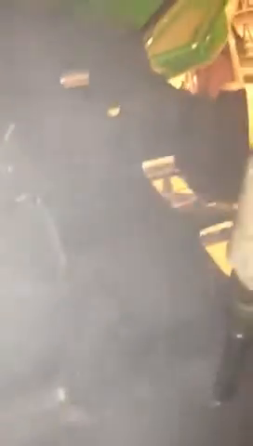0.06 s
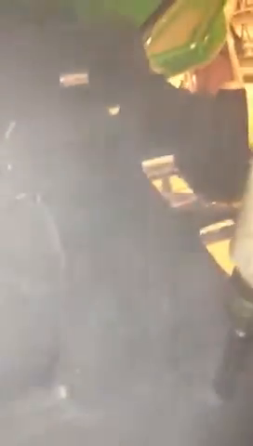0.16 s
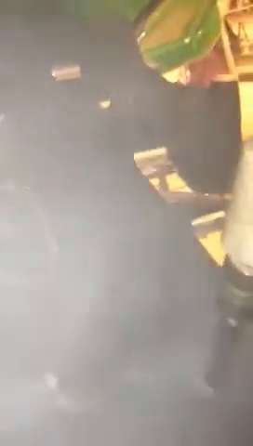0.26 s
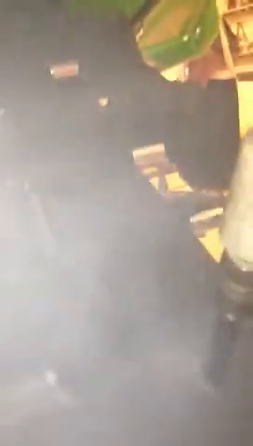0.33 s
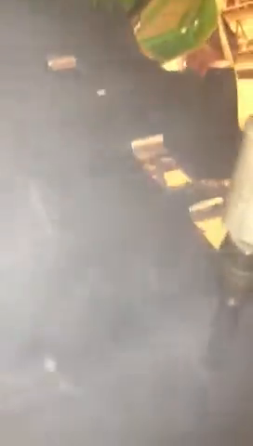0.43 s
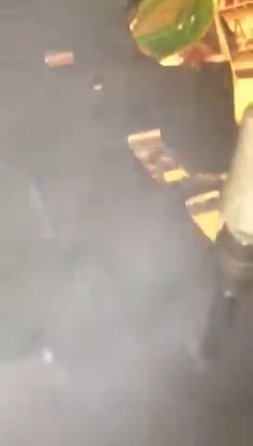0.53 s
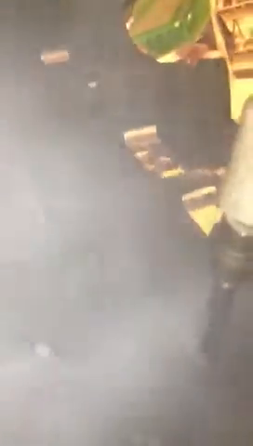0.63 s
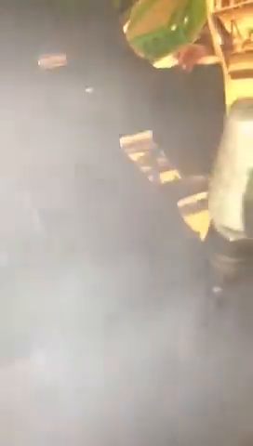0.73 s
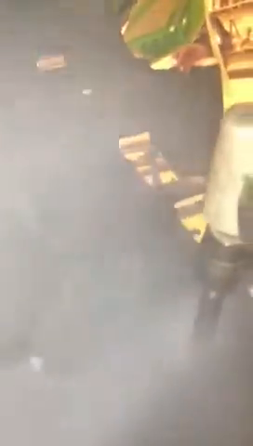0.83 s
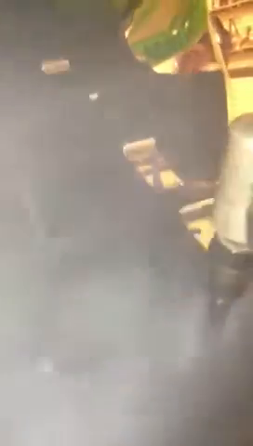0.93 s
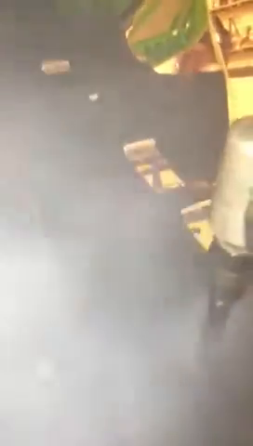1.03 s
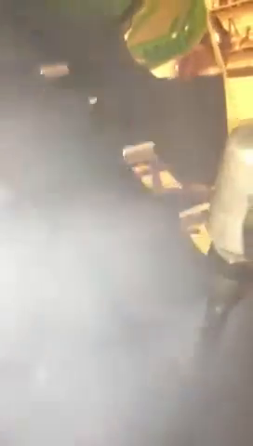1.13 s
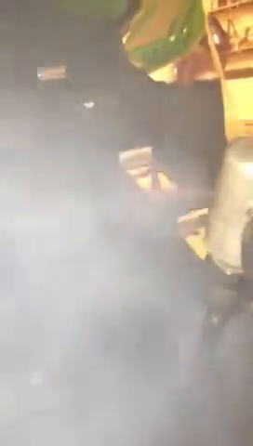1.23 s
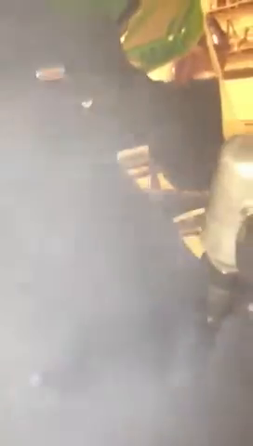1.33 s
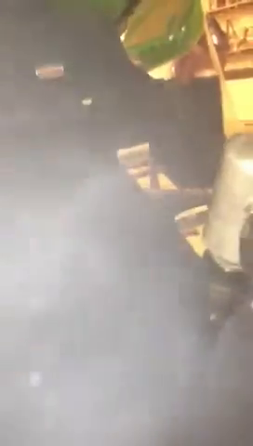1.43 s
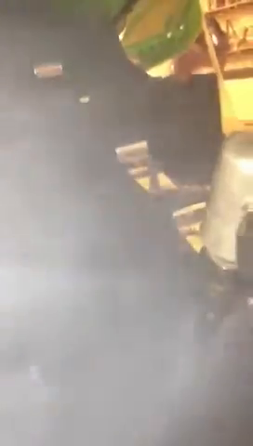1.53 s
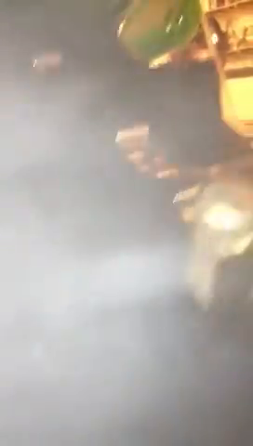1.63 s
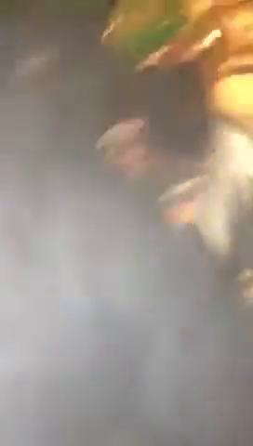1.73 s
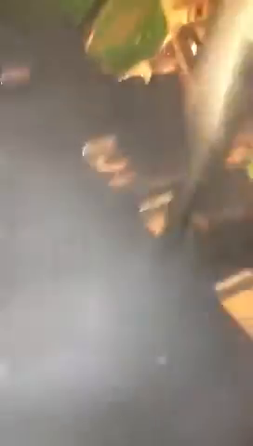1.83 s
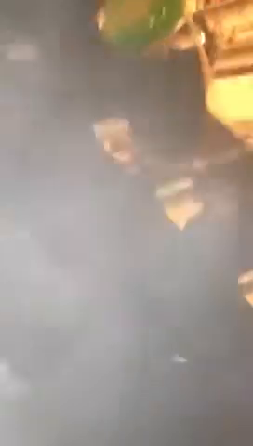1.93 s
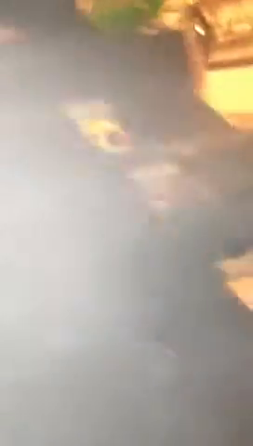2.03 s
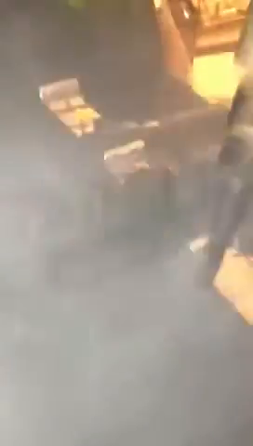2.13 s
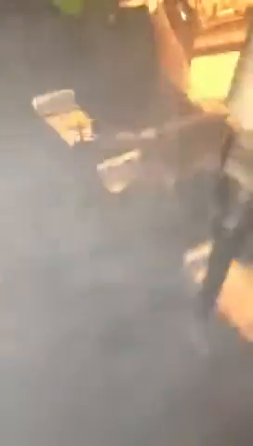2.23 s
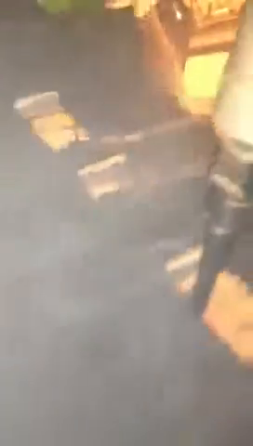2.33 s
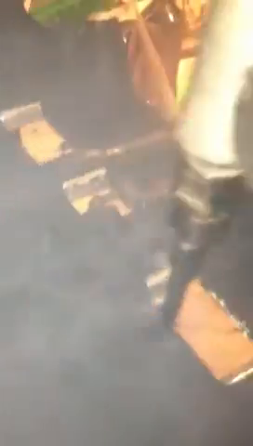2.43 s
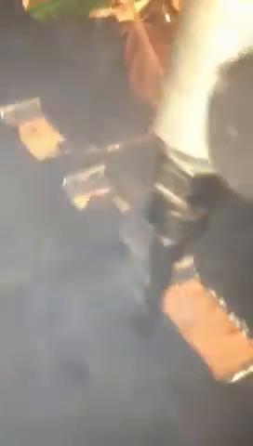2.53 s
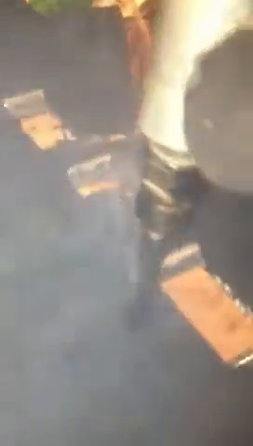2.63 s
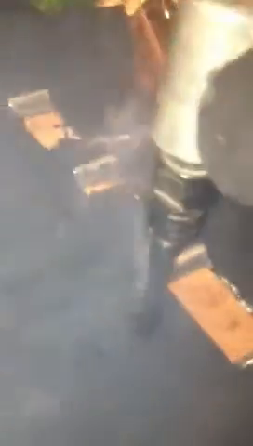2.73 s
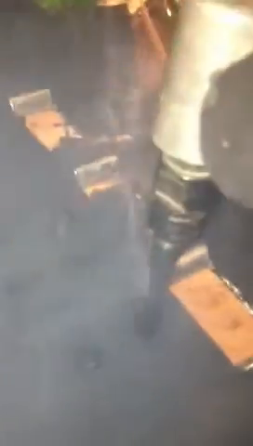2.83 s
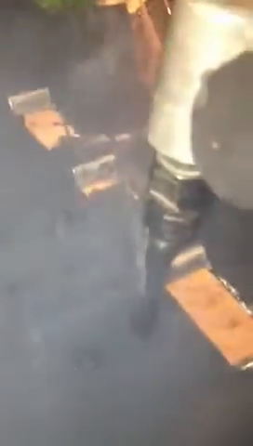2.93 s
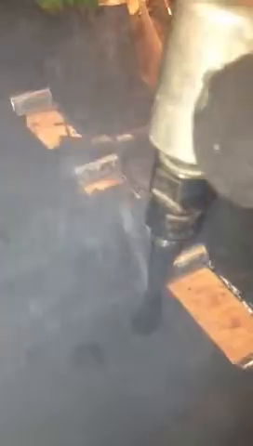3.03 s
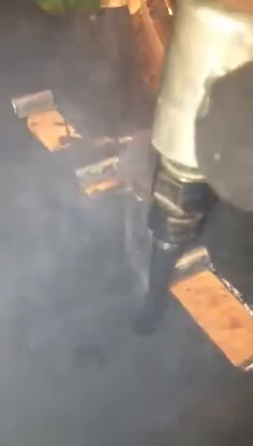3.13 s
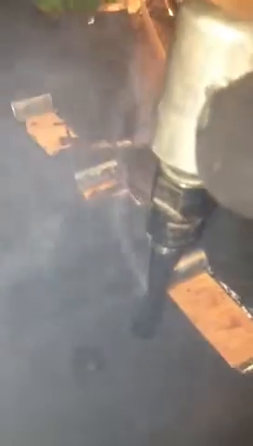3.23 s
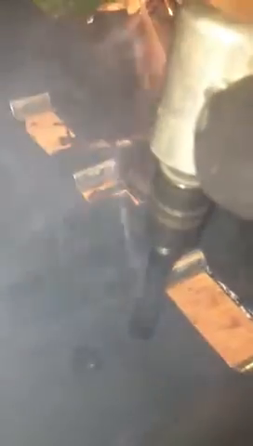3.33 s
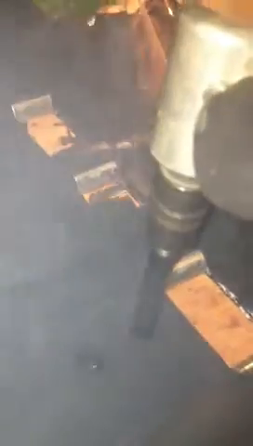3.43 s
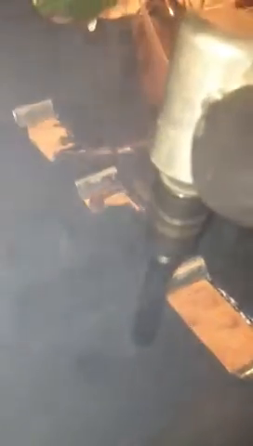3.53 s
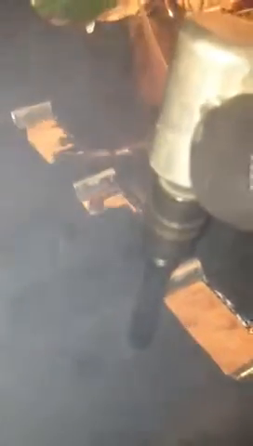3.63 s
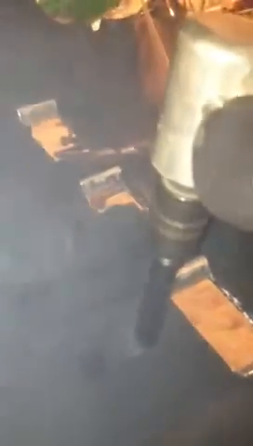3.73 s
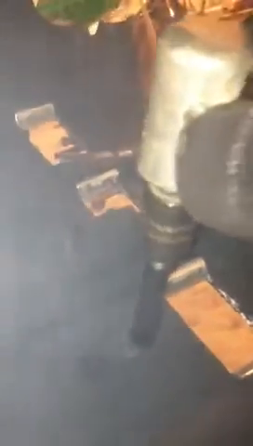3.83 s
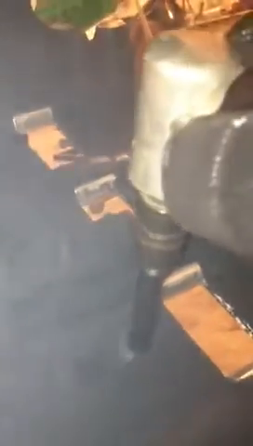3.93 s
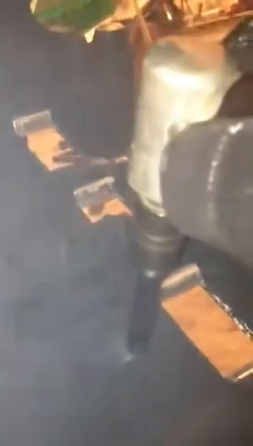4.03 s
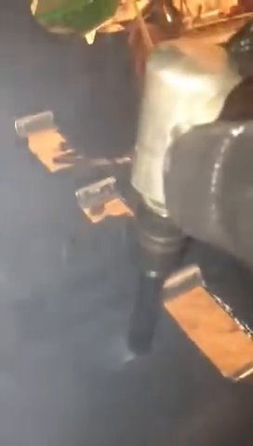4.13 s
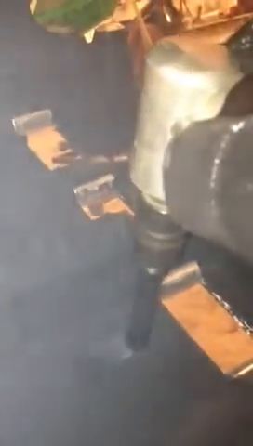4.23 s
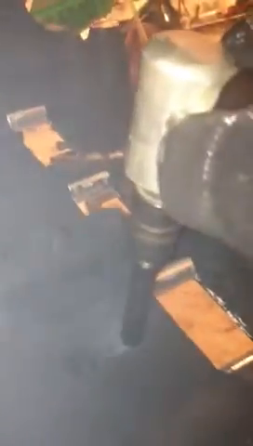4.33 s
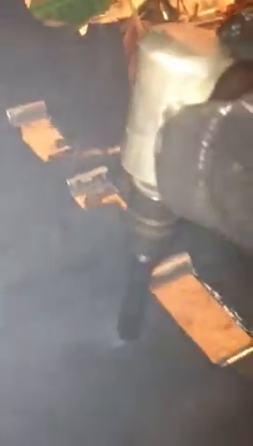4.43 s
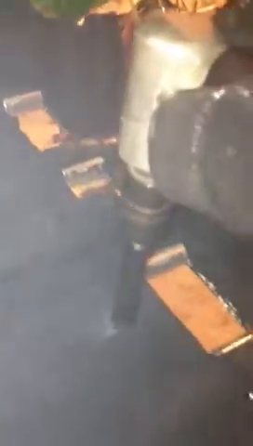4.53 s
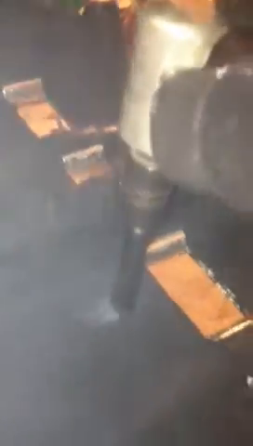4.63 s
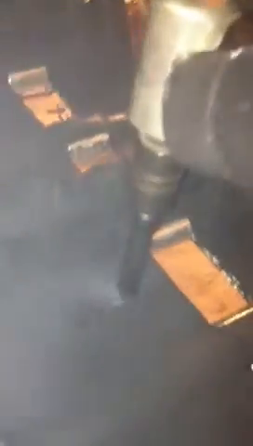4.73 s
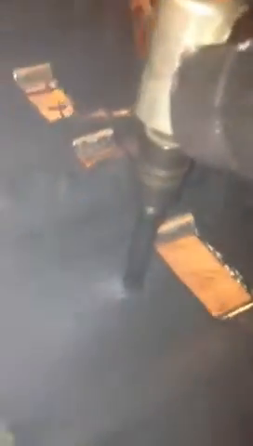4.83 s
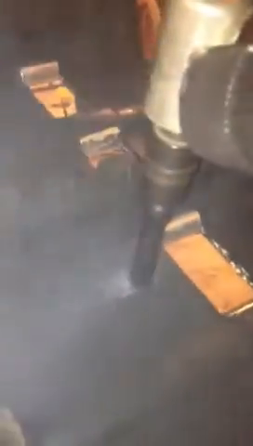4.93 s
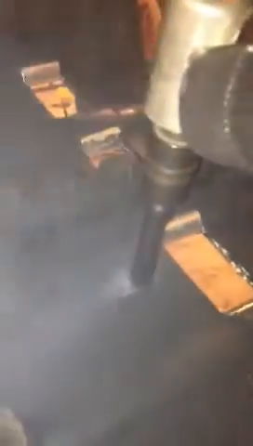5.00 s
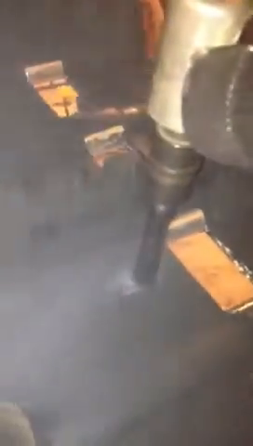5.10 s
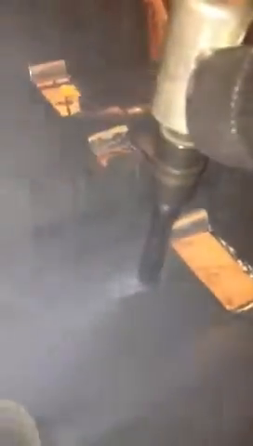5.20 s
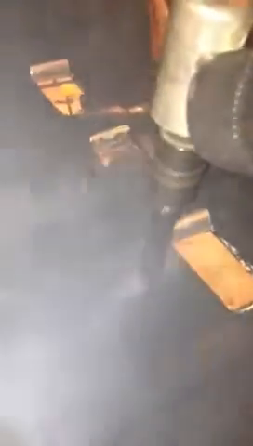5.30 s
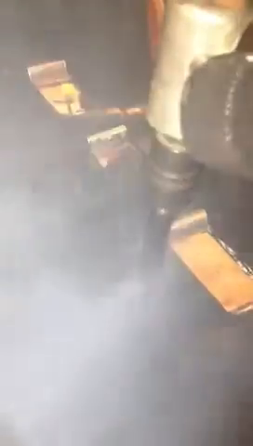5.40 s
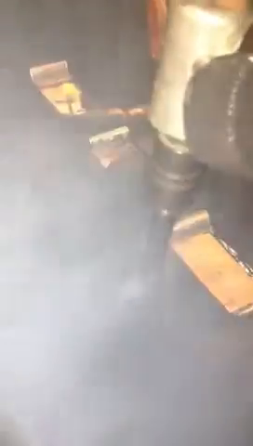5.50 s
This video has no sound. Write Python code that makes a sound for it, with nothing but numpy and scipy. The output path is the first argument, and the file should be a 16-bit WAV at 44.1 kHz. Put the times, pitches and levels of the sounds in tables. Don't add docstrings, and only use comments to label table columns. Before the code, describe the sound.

A close air-powered grinder whines shrilly through rubber, jams, jumps free, winds down to a distant compressor's rattle, then spins up again.

```python
import sys
import numpy as np
from scipy import signal
from scipy.fft import rfft, irfft, next_fast_len
from scipy.io import wavfile
from scipy.ndimage import uniform_filter1d

SR = 44100
rng = np.random.default_rng(int(sys.argv[2]) if len(sys.argv) > 2 else 0)


def volts_from_decibels(level):
    exponent = np.asarray(level, float) / 20
    return 10 ** exponent


def output_pcm(signal):
    pcm = np.clip(np.atleast_2d(signal).T, -1, 1) * 32767
    wavfile.write(sys.argv[1], SR, np.round(pcm).astype(np.int16))


N = 245195
SIZE = next_fast_len(N + SR)
HZ = np.maximum(np.arange(SIZE // 2 + 1) * SR / SIZE, 1)
TIME = np.arange(N) / SR
FIRST_HALF = TIME < 2.5


def rms_one(x):
    return x / np.sqrt(np.mean(x ** 2) + 1e-20)


def in_time(rows):
    s, value = np.transpose(rows)
    return np.interp(TIME, s, value)


def smooth_in_time(rows):
    s, value = np.transpose(rows)
    slope = np.gradient(value, s)
    i = np.clip(np.searchsorted(s, TIME) - 1, 0, len(s) - 2)
    span = s[i + 1] - s[i]
    u = np.clip((TIME - s[i]) / span, 0, 1)
    blend = value[i] + (value[i + 1] - value[i]) * u * u * (3 - 2 * u)
    return blend + span * u * (1 - u) * ((1 - u) * slope[i] - u * slope[i + 1])


def at_hz(points, hz):
    x, db = np.array(points)[:, 0], np.array(points)[:, 1]
    return np.interp(np.log(hz), np.log(x), db)


def drift(rate):
    r = np.exp(-80 * np.pi * rate / SR)
    white = rng.standard_normal(N // 40 + 2002)
    slow = signal.lfilter([1], [1, -2 * r, r * r], white)[2000:]
    return np.interp(np.arange(N) / 40, np.arange(len(slow)), rms_one(slow))


def resonate(x, modes):
    out = np.zeros(N)
    for k, (hz, width, db) in enumerate(modes):
        r = np.exp(-np.pi * width / SR)
        b = (1 - r * r) / 2 * np.array([1, 0, -1])
        a = [1, -2 * r * np.cos(2 * np.pi * hz / SR), r * r]
        out += (-1) ** k * volts_from_decibels(db) * signal.lfilter(b, a, x + 1e-18)
    return out


def patchy_noise(spectrum, patchy_db, rate, tilt_db=0):
    coloured = rfft(rng.standard_normal(SIZE)) * volts_from_decibels(at_hz(spectrum, HZ))
    together, out = drift(0.8), np.zeros(N)
    for centre in np.arange(6, 14.1, .5):
        share = np.clip(1 - 2 * np.abs(np.log2(HZ) - centre), 0, 1)
        flicker_db = patchy_db * (0.3 * together + drift(rate))
        out += volts_from_decibels(tilt_db * max(centre - 13, 0) + flicker_db) * irfft(coloured * share, SIZE)[:N]
    return rms_one(out)


def glide(since, top_s, rest_s):
    return np.exp(-top_s / rest_s * np.logaddexp(0, -since / top_s))


def rotor_speed():
    # bend_s (between the two constants), near_full_time_constant_s, near_rest_time_constant_s
    slows = [
        (1.603, .014, .013),
        (1.8352, .005, .0671),
    ]
    # bend_s (between the two constants), near_full_time_constant_s, near_rest_time_constant_s
    runs_up = [
        (1.7952, .0073, .0491),
        (3.4687, .0279, .0456),
    ]
    glide_share = .96
    lost = sum(glide(s - TIME, top, rest) - 1 for s, top, rest in slows)
    won = sum(glide(TIME - s, top, rest) for s, top, rest in runs_up)
    return np.maximum(1 + glide_share * (lost + won), .02)


def bore_load():
    # time_s, vane_rate_hz
    first_bore = [(0.0, 1308), (0.124, 1384), (0.455, 1389), (0.636, 1303), (0.978, 1265), (1.09, 1257),
                  (1.33, 1352), (1.46, 1285), (1.57, 1051)]
    # time_s, vane_rate_hz
    second_bore = [(3.54, 1545), (3.861, 1460), (3.965, 1357), (4.24, 1423), (4.63, 1379), (4.801, 1313),
                   (5.27, 1254), (5.346, 1188), (5.56, 1190)]
    free = glide(TIME - 1.655, .012, .012)
    return np.where(FIRST_HALF, (1 - free) * smooth_in_time(first_bore) + free * 1405,
                    smooth_in_time(second_bore))


def air_supply(speed):
    # time_s, level_db
    lever = [(0, -18), (.42, -16.5), (.62, -19), (1.08, -20), (1.25, -18.5), (1.8, -17), (3.4, -16),
             (3.62, -15.5), (3.85, -17.5), (4.23, -15.5), (4.95, -18), (5.56, -18)]
    valve = glide(1.827 - TIME, 0.024, 0.038) + glide(TIME - 3.334, 0.0077, 0.024)
    open_db = in_time(lever) + 0.92 * np.log2(speed)
    seep_db = -49.5
    return open_db, 20 * np.log10(valve * volts_from_decibels(open_db) + volts_from_decibels(seep_db))


def controls():
    # pitch_hz, level_over_air_db
    housing = [(100, -28), (220, -1.5), (400, -15.5), (560, -4), (830, -1), (1000, -5.5), (1250, -3.5),
               (1550, -2)]
    # pitch_hz, level_over_air_db
    overtones = [(300, -17), (550, -2), (830, -2), (1000, -17), (1850, -16), (2150, -3), (2600, 0.5),
                 (4500, -8)]
    # shaft_hz, level_over_air_db
    wobble = [(60, -64), (200, -9), (245, -33.5), (258, -18.5), (272, -11.5), (285, -17), (296, -14),
              (307, -24.5)]
    lower_db = (1.3, -0.1, -1)
    coast_share = (.3, .5, .85)
    speed = rotor_speed()
    vane_hz = bore_load() * speed
    open_db, air_db = air_supply(speed)
    soft_db = -11 * np.exp(-((TIME - 1.822) / .014) ** 2)
    lower = []
    for k, (db, share) in enumerate(zip(lower_db, coast_share), start=1):
        puff_db = np.where(FIRST_HALF, open_db + share * (air_db - open_db), air_db)
        colour_db = at_hz(housing if k == 1 else overtones, k * vane_hz)
        lower.append(puff_db + db + colour_db + (k - .5) * soft_db)
    gliding = uniform_filter1d(np.abs(np.gradient(np.log2(speed))) * SR, size=6000)
    wobble_db = air_db + at_hz(wobble, vane_hz / 5) - 2 * np.minimum(gliding, 5)
    return vane_hz, lower, wobble_db, air_db


def cancelled(hz):
    # pitch_hz, width_hz, before_pause_db, after_pause_db
    nulls = [(1345.5, 3.7, -5, -33), (1419, 18, -2.5, -11), (2820, 36, -4, -11.5), (3300, 190, 7, -7.5),
             (4010, 100, -11.5, -2.5), (1774, 232, 1.5, -13), (1040, 43, -2.5, -2), (1372, 14.3, -9, -5),
             (2715, 8.3, -4, -5), (2545, 80, 4, -9), (4386, 89, -14, -25), (3850, 15, 1.5, -22),
             (2445, 180, -5, 5), (1515, 17, -4, 5)]
    return sum(np.where(FIRST_HALF, early_db, late_db) / (1 + ((hz - null_hz) / width) ** 2)
               for null_hz, width, early_db, late_db in nulls)


def bit_wobble(turn, wobble_db):
    return volts_from_decibels(wobble_db + .8 * drift(15)) * (1 + .2 * drift(70)) * np.sin(turn / 5)


def lower_vane_tones(turn, vane_hz, lower, slow):
    tones = np.zeros(N)
    for k, db in enumerate(lower, start=1):
        smear_db = (k - 1) * slow * (2.2 * drift(45) - 2.5)
        level = volts_from_decibels(db + smear_db + cancelled(k * vane_hz) + 0.72 * drift(12.0))
        tones += level * np.sin(k * turn + rng.uniform(0, 2 * np.pi))
    return tones


def upper_vane_tones(turn, vane_hz, air_db, slow):
    # pitch_hz, level_over_air_db
    exhaust = [(540, -21), (830, -14.5), (1150, 6), (2300, -1), (5000, -16), (6100, -21.5), (7300, -18.5),
               (7800, -15.5), (8450, -11.5), (10000, -22), (11300, -12), (12200, -22), (13100, -10),
               (14000, -34)]
    # multiple, level_db
    upper = [(4, 1), (5, 10), (6, 4), (7, -0.5), (8, -7), (9, -13.5), (10, -18), (12, 0), (27, 10)]
    crawl = np.maximum(slow, np.clip(2 - vane_hz / 400, 0, 1))
    tones = np.zeros(N)
    for k in range(4, 28):
        hz = k * vane_hz
        db = air_db + at_hz(exhaust, hz + 1) + at_hz(upper, k) + cancelled(hz) + 2.8 * drift(5.8)
        crawl_db = (6 + 17 * np.clip(hz / 300 - 2.9, 0, 1)) * crawl
        level = (hz < SR / 2.5) * volts_from_decibels(db - crawl_db - 1.5)
        tones += level * np.sin(k * turn + .4 * rng.standard_normal())
    return tones


def shaft_lines(turn, vane_hz, air_db, slow):
    # shaft_multiple, level_over_air_db, share_of_unevenness
    shaft = [(2, -37.5, 0.097), (3, -33, 0.38), (4, -25.5, 1.3), (6, -38.5, 0.23), (7, -22, 1.0),
             (8, -23.5, 0.31), (9, -21.5, 0.17), (11, -16.5, 2), (12, -41, 0.71), (13, -52, .4),
             (14, -24, .2)]
    # time_s, level_db
    uneven = [(0, -3), (.6, -19), (1.5, -13.5), (3.45, 5.5), (3.7, -3.5), (4.6, -1), (4.9, -7), (5.3, -26),
              (5.56, -1)]
    # pitch_hz, width_hz, level_db
    bit_hz, bit_width, bit_db = (1412, 9.3, 24.7)
    uneven_db = in_time(uneven)
    tones = np.zeros(N)
    for k, db, share in shaft:
        ring_db = bit_db / (1 + ((k * vane_hz / 5 - bit_hz) / bit_width) ** 2)
        level = volts_from_decibels(air_db + db + ring_db - 3.9 * slow + share * uneven_db + 2.26 * drift(6.0))
        tones += level * np.sin(k * turn / 5 + rng.uniform(0, 2 * np.pi))
    return tones


def exhaust_hiss(turn, vane_hz, air_db):
    # pitch_hz, level_db_per_hz
    hiss = [(150, -53), (550, -21), (1000, -17.5), (1700, -9), (2350, -4), (3400, -3), (4120, -14.5),
            (4700, -10), (5900, -6), (6500, -6.5), (7800, 0.5), (9500, -7), (12500, -8.5), (15300, -7.5)]
    # time_s, tilt_db_per_octave
    bright = [(0, -1), (.4, -4), (.8, 2.5), (1.5, 1), (3.3, -8), (3.8, 0), (4.3, 0.5), (5.56, 2)]
    puffs = 1 + np.clip(0.22 / (1 + vane_hz / 400), 0, 1) * np.cos(turn)
    flow = np.sqrt(np.maximum(volts_from_decibels(air_db) ** 2 - volts_from_decibels(-46) ** 2, 0))
    noise = patchy_noise(hiss, patchy_db=1.5, rate=15.0, tilt_db=in_time(bright))
    return volts_from_decibels(0.5) * flow * puffs * noise


def grinder():
    # pitch_hz, width_hz, level_db
    passages = [(531, 114, 1.5), (845, 14, 8), (1119, 9.8, 5.5), (2173, 200, 10), (2400, 190, -11)]
    vane_hz, lower, wobble_db, air_db = controls()
    vane_hz *= 1 + .0015 * drift(30) + .045 * np.exp(-vane_hz / 450) * drift(70)
    turn = 2 * np.pi * np.cumsum(vane_hz) / SR
    running = np.clip((air_db + 46) / 10, 0, 1)
    speed_change = uniform_filter1d(np.gradient(np.log(vane_hz)), size=900) * SR
    slow = np.clip(np.abs(speed_change) / 4, 0, 1)
    tones = bit_wobble(turn, wobble_db) + lower_vane_tones(turn, vane_hz, lower, slow)
    tones += upper_vane_tones(turn, vane_hz, air_db, slow) + shaft_lines(turn, vane_hz, air_db, slow)
    tones *= np.sqrt(2) * running
    return volts_from_decibels(1.0) * (tones + resonate(tones, passages)), exhaust_hiss(turn, vane_hz, air_db)


def room(x, t60, dull_hz):
    lag = np.arange(SR) / SR
    tail = rng.standard_normal(len(lag)) * volts_from_decibels(-60 * lag / t60) * (lag > .008)
    tail = tail / np.sqrt(np.sum(tail ** 2))
    echoes = rfft(x, SIZE) * rfft(tail, SIZE)
    return irfft(echoes / (1 + 1j * HZ / dull_hz) ** 2 / (1 - 1j * 1100 / HZ), SIZE)[:N]


def compressor():
    # crank_multiple, level_db
    crank_hum = [(1, -50), (2, -44), (3, -30), (4, -18.5), (5, -8.5), (6, -10), (7, -22), (8, -34),
                 (9, -0.5), (10, -16), (11, -11), (12, -15), (13, -30), (14, -21), (15, -39), (16, -13),
                 (17, -18), (18, -48), (19, -2.5), (20, -7), (21, -10), (22, -9), (23, -6), (24, -10),
                 (25, -47), (26, -4.5), (27, -4.5), (28, -7.5), (29, -6.5), (30, -29.5), (31, -9),
                 (32, -15), (33, -39.5), (34, -30), (35, -12)]
    # share_of_turn, head_db, plate_db
    valve_knocks = [(.13, -9, -16), (.28, -18, -2), (.39, -16, 0), (.46, -8, -5), (.61, 0, -10),
                    (.71, -3, -14)]
    # pitch_hz, width_hz, level_db
    head_modes = [(1060, 33, -23), (1290, 47, -6), (1634, 12.5, 16), (1683, 84, 7), (1975, 88, -1.5)]
    # pitch_hz, width_hz, level_db
    plate_modes = [(2770, 51, -16), (3200, 14, 10), (3400, 180, 2.5), (3620, 110, 6.5), (5500, 160, -15),
                   (6070, 26, 7)]
    crank_hz = 29.4
    turn = 2 * np.pi * crank_hz * TIME + 0.021 * drift(1.6)
    hum = sum(volts_from_decibels(db + 1.3 * drift(1.3)) * np.sin(k * (turn - .45) + 1.37 * rng.standard_normal())
              for k, db in crank_hum)
    head, plate = np.zeros(N), np.zeros(N)
    starts = np.arange(int(N / SR * crank_hz) - 1)
    for share, head_db, plate_db in valve_knocks:
        chance = rng.standard_normal((len(starts), 3))
        at = ((starts + share) / crank_hz * SR + 1.5 * chance[:, 0]).astype(int)
        head[at] += volts_from_decibels(head_db + 1.2 * chance[:, 1])
        plate[at] += volts_from_decibels(plate_db + 1.2 * chance[:, 2])
    knocks = volts_from_decibels(-44.0) * rms_one(resonate(head, head_modes))
    knocks += volts_from_decibels(-46.5) * rms_one(resonate(plate, plate_modes))
    return volts_from_decibels(-35.5) * hum + knocks + volts_from_decibels(-6) * room(knocks, t60=.5, dull_hz=9000)


def shop_floor():
    # pitch_hz, level_db_per_hz
    shop = [(35, -62), (60, -53), (123, -11), (264, -1.5), (396, -13), (553, -5), (800, -12), (1160, -6.5),
            (1680, -12), (2170, -16), (3270, -14.5), (5000, -25.5), (6500, -60), (11000, -120)]
    # pitch_hz, level_db_per_hz
    leak = [(2470, -36), (4200, -9.5), (6170, -1), (6870, -7.5), (8810, -7), (9560, -15), (11400, -8),
            (13100, -12), (14200, -8), (15300, -13)]
    fans = volts_from_decibels(-38) * patchy_noise(shop, patchy_db=-3.0, rate=7.4)
    return fans + volts_from_decibels(-46.0) * patchy_noise(leak, patchy_db=0.7, rate=11.0)


def wide_frames():
    # middle_s, low_hz, high_hz, level_db
    wide = [(.02, 7300, 9200, -30), (.13, 4200, 11800, -26), (.365, 11700, 13600, -36),
            (.385, 5600, 7000, -34), (.62, 4200, 5500, -36), (.62, 10300, 12000, -34),
            (.62, 13700, 15300, -36), (.87, 6900, 8700, -29), (.97, 6900, 8700, -29),
            (1.5, 12200, 14200, -34), (1.55, 6900, 8700, -29), (1.55, 4200, 5500, -36),
            (4.43, 5600, 8700, -25), (5.4, 9600, 11300, -33), (5.45, 8200, 9800, -32)]
    white, out = rfft(rng.standard_normal(SIZE)), np.zeros(N)
    for s, low_hz, high_hz, db in wide:
        band = rms_one(irfft(white * (HZ > low_hz) * (HZ < high_hz), SIZE)[:N])
        out += volts_from_decibels(db) * band * np.clip((.024 - np.abs(TIME - s)) / .006, 0, 1)
    return out * np.array([[1], [-1]])


def scene():
    # time_s, gain_db
    far_gain = [(0, -11.5), (1.9, -5.5), (2.1, -4), (2.4, -2), (2.8, 0), (3.28, 1.5), (3.4, -8),
                (5.56, -10)]
    no_bass = signal.butter(4, 110, "high", fs=SR, output="sos")
    tones, hiss = signal.sosfilt(no_bass, grinder())
    echo = volts_from_decibels(-1) * room(tones, t60=.65, dull_hz=4500) + volts_from_decibels(4) * room(hiss, t60=.7, dull_hz=3500)
    far = echo + compressor() + shop_floor()
    mono = tones + hiss + volts_from_decibels(in_time(far_gain)) * far
    return np.array([mono, mono])


def top_cut(x):
    return signal.sosfilt(signal.butter(12, 16530, fs=SR, output="sos"), x)


def record(dry):
    x = .95 * np.tanh(dry / .95) + wide_frames()
    x = signal.sosfilt(signal.butter(2, 70, "high", fs=SR, output="sos"), x)
    x = irfft(rfft(x, SIZE) * (HZ < 15300), SIZE)[:, :N]
    return top_cut(x)


dry = scene()
out = record(dry)
output_pcm(out)
```